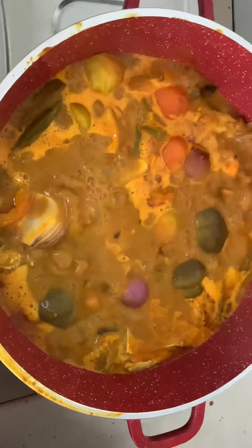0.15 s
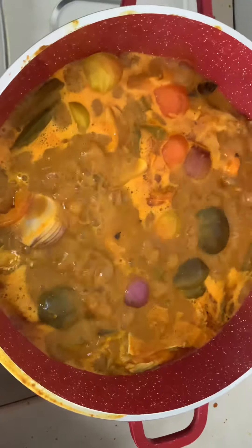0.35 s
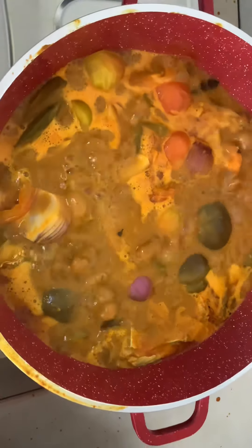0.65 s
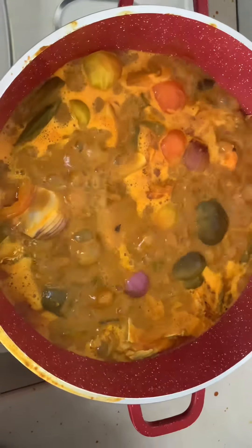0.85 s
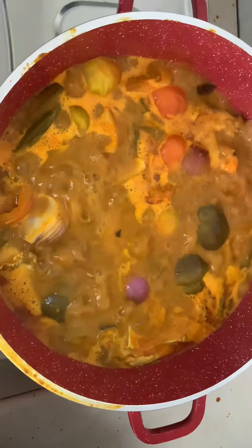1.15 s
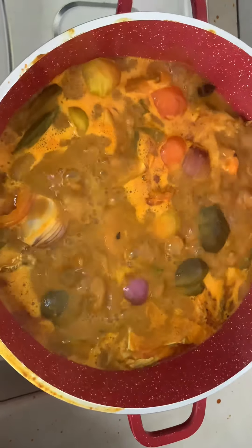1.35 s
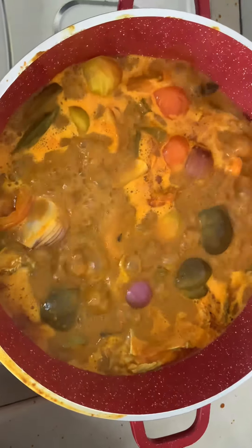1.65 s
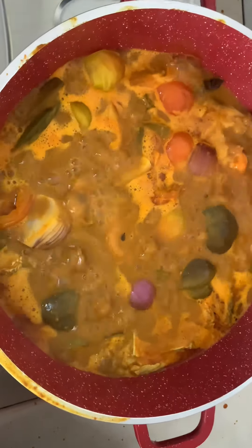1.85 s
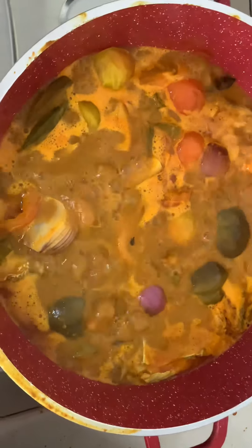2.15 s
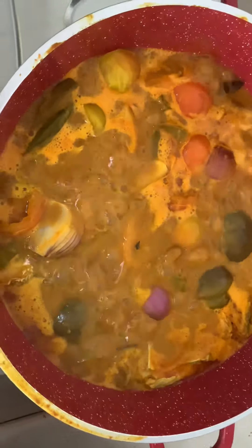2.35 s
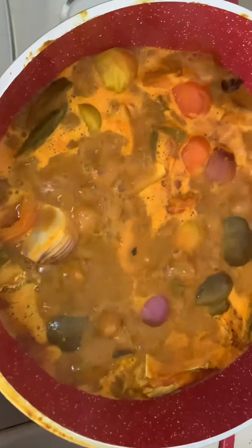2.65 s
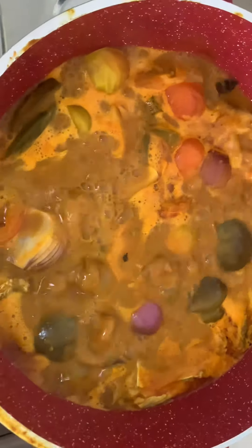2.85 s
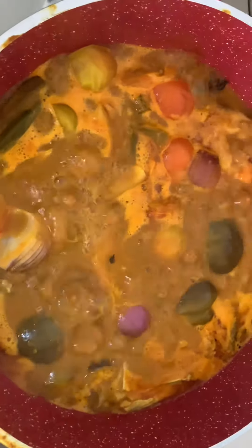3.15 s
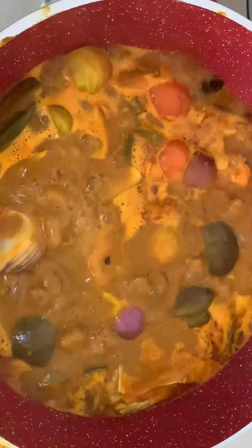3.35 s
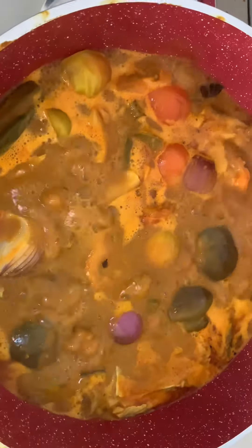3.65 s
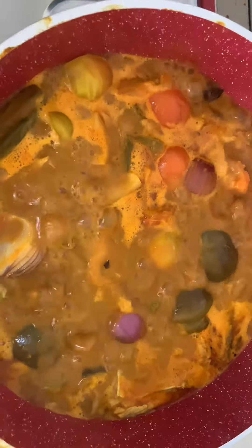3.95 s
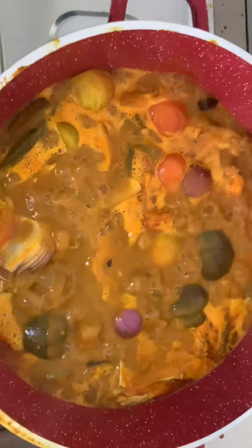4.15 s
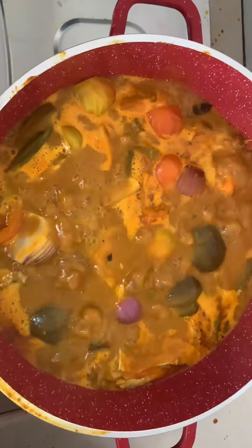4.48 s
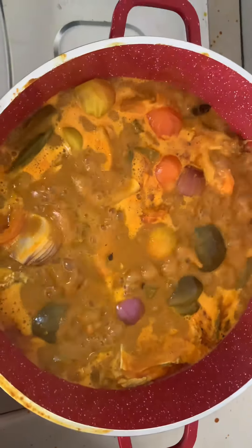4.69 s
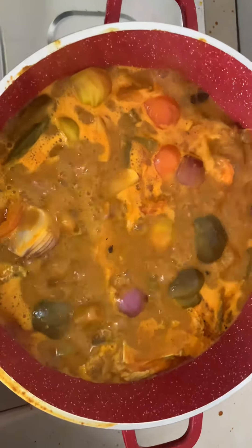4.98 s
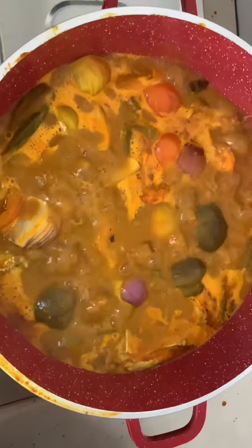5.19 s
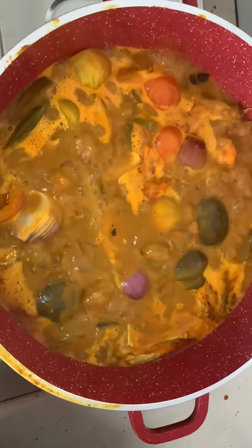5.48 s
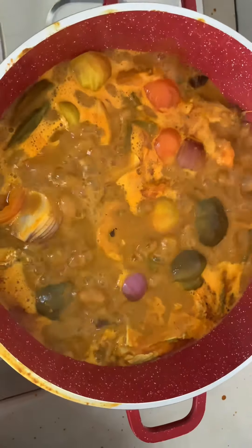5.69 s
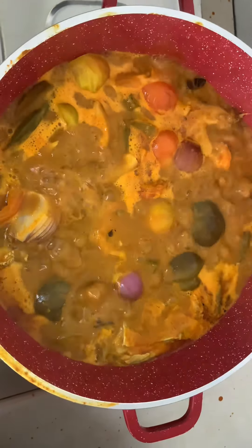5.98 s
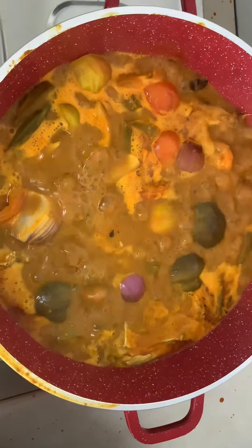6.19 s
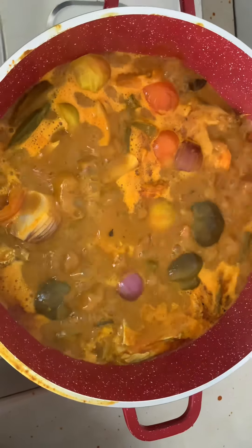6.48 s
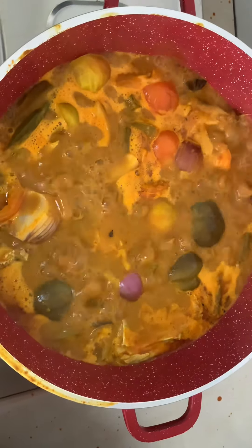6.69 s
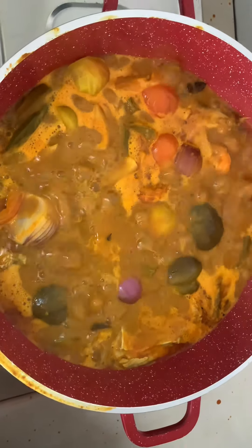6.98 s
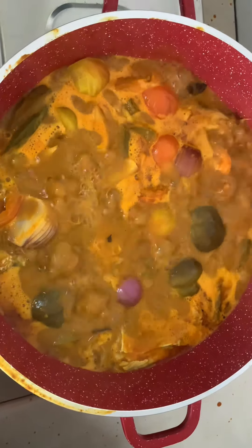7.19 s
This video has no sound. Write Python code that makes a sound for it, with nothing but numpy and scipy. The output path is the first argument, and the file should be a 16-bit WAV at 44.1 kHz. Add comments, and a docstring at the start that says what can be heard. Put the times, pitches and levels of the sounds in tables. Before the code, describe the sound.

A thick stew bubbles steadily in a wide open pan, heard from just above. Rounded wet plops of differing pitch burst irregularly, singly and in quick clusters, with small blips and faint ticks between them. Beneath runs a low, slightly wavering motor drone with soft rushing air. Close stereo hand-held microphone in a kitchen, with only short reflections from pan and room.

```python
"""A thick stew simmers in a wide open pan, heard from just above by a two-port hand-held microphone.
Bubbles burst with short plops and spit tiny ticks over a dense fizz; a motor nearby drones on the orders
of its turning rate, and its air noise rings in a few cavity resonances."""
import sys
import numpy as np
from scipy import signal
from scipy.fft import rfft, irfft, next_fast_len
from scipy.io import wavfile

SR = 44100
rng = np.random.default_rng(int(sys.argv[2]) if len(sys.argv) > 2 else 0)


def wav_record(signal):
    """Record a signal, one row per channel, as 16-bit PCM in the file named by sys.argv[1]."""
    frames = np.transpose(np.atleast_2d(signal))
    bounded = np.clip(frames, -1, 1)
    # unit amplitude maps onto the largest positive 16-bit level
    quanta = np.round(bounded * 32767).astype(np.int16)
    wavfile.write(sys.argv[1], SR, quanta)


N = 323253

# motor drone, slow swells: (s, fourth order dB, fifth order dB)
MOTOR = [(0.0, -26, -32.5), (0.12, -23.5, -42), (0.53, -24, -40), (0.57, -24.5, -59), (0.92, -27, -35), (1.84, -30, -38.5),
         (2.39, -38.5, -36.5), (2.45, -26.5, -34), (2.55, -28.5, -60), (2.72, -32.5, -35), (3.23, -27.5, -36.5), (3.29, -27.5, -44),
         (3.69, -32.5, -37.5), (3.8, -25.5, -56), (3.9, -27.5, -39), (4.53, -28, -41), (4.9, -31, -36), (5.16, -36, -40.5),
         (5.22, -47, -35), (5.37, -31, -33.5), (6.12, -32.5, -39), (6.19, -48, -40), (6.27, -36, -40), (6.84, -42, -31.5),
         (7.19, -28, -48), (7.33, -36, -43)]
FAINT_ORDERS = [(3, -54), (6, -52.5)]   # (order, dB) wavering
# air noise resonances: (Hz, width Hz, left dB, right dB)
CAVITY = [(86.24, 14.5, -41, -35.5), (121, 39, -54.5, -45), (164.5, 16, -55.5, -54.5), (213, 10, -58, -53.5), (261, 43.5, -57.5, -50), (433.7, 10.5, -57, -50),
          (479.5, 35, -86, -46.5), (670.4, 48, -61, -51.5), (731.2, 25, -60, -54.5), (870, 34, -73, -63.5), (1684, 27, -64.5, -63)]
# the loudest bubbles bursting: (s, peak dB, pitch Hz)
PLOPS = [(0.0266, -33, 690), (0.139, -34, 1006), (0.15, -22.5, 1230), (0.156, -35, 1730), (0.1773, -31, 1260), (0.222, -26, 870), (.2302, -28, 820), (.238, -41, 950), (0.2998, -41, 1640), (0.3648, -33, 1140), (.3798, -45, 1590), (0.413, -41, 3360),
         (0.477, -37, 2050), (0.481, -33, 1620), (0.49, -34, 1590), (0.499, -40, 1640), (0.509, -40, 1710),
         (0.52, -35, 1370), (.5269, -47, 1830), (0.5646, -37.5, 3380), (0.605, -35, 1040), (.7255, -47, 1760), (.7999, -41, 3430), (0.923, -36, 860), (.938, -29, 970), (.9883, -42, 2100), (1.074, -30.5, 1190), (1.1354, -39, 3640),
         (1.1807, -28, 810), (1.184, -29.5, 1150), (1.2721, -38, 2200), (1.2727, -31, 785), (1.282, -24, 850), (1.4264, -25.5, 1030), (1.4654, -26, 756),
         (1.4872, -38, 1050), (1.577, -32.5, 680), (1.7336, -42, 4170), (1.7428, -36, 1430), (1.7467, -34, 740), (1.851, -41, 740),
         (1.868, -29, 740), (1.8808, -22.5, 1130), (1.892, -37, 1290), (2.083, -37, 730), (2.214, -44, 830), (2.3063, -32, 1300), (2.321, -33.5, 950),
         (2.3522, -34.5, 1580), (2.354, -38, 1950), (2.4092, -42, 2180), (2.441, -37, 730), (2.573, -36, 860), (2.581, -32, 1840), (2.613, -39, 1400), (2.641, -39, 1700),
         (2.659, -35, 1040),
         (2.6801, -39, 1600), (2.6972, -39, 1060), (2.7266, -46, 1700), (2.8196, -39, 1370), (2.8334, -35, 1660), (2.9775, -41, 1590), (2.989, -36, 1130), (3.0394, -31, 1530), (3.1009, -28, 900), (3.198, -36.5, 1560), (3.205, -30, 1030), (3.2817, -33, 870),
         (3.329, -36, 1450), (3.3322, -42, 4120), (3.4271, -32, 790), (3.4423, -40, 1590), (3.46, -39, 834), (3.478, -38, 740), (3.517, -37, 1110),
         (3.5439, -34, 764), (3.6303, -43, 4230), (3.646, -39, 1030), (3.693, -33, 810), (3.7175, -29.5, 865), (3.7907, -30.5, 1580), (3.8134, -24.5, 840),
         (3.8296, -30, 760), (3.923, -29, 950), (3.941, -36, 1430), (3.9454, -29, 980), (3.956, -34, 990), (3.974, -38, 1600), (4.0527, -42.5, 3700), (4.065, -36, 1590),
         (4.101, -33, 810), (4.136, -22.5, 900),
         (4.154, -34, 970), (4.1658, -35.5, 3680), (4.1786, -39, 3640), (4.178, -33, 1510), (4.178, -36, 2050), (4.18, -35, 1000), (4.216, -42, 3020), (4.322, -39, 3970), (4.337, -31, 1160), (4.38, -37, 900), (4.3898, -34.5, 1480),
         (4.474, -37, 1200), (4.4881, -29.5, 760), (4.527, -33, 1300), (4.637, -32.5, 730), (4.6557, -41, 1640),
         (4.6598, -32, 710), (4.679, -35, 2150), (4.706, -38, 1380), (4.751, -33.5, 796), (4.9444, -40, 2180),
         (4.9923, -41, 3700), (5.0571, -29, 730), (5.0687, -29.5, 750), (5.1624, -41, 1500), (5.2236, -32, 660),
         (5.2388, -34, 786), (5.335, -35, 1000), (5.389, -37, 2050), (5.3949, -29, 775), (5.401, -34, 1500), (5.407, -32, 1170), (5.4182, -36, 910),
         (5.45, -29, 1310), (5.481, -26, 870), (5.569, -37, 1460), (5.647, -32.5, 735), (5.6872, -32.5, 1640),
         (5.6946, -37, 1830), (5.7166, -37, 720), (5.787, -37, 1200), (5.9049, -38, 700), (5.936, -31.5, 920), (6.11, -34, 646), (6.158, -40, 2290), (6.159, -30, 1310), (6.1734, -27.5, 1010), (6.3575, -29.5, 1150), (6.39, -33, 1200), (6.39, -36, 1750),
         (6.4868, -36, 980), (6.4935, -35, 900), (6.558, -36, 1630), (6.6137, -30, 655), (6.6774, -36, 960), (6.8362, -38, 1240), (6.843, -40, 1430),
         (6.85, -35, 1580), (6.8836, -29, 1000), (6.9534, -31, 920), (6.965, -41, 1590), (6.9667, -32.5, 740), (7.1621, -37, 1230)]
# the loudest small films snapping: (s, peak dB, pitch Hz)
TICKS = [(.413, -49, 6800), (.5765, -50, 11350), (.677, -48, 6840), (.7317, -46, 9700), (.9575, -47, 6440), (1.006, -50, 11000), (1.1108, -49, 10500), (1.1109, -49, 6870), (1.1372, -46, 7200), (1.3762, -51, 6740), (1.5872, -51, 11000), (1.5887, -47, 6460), (1.852, -54, 11500),
         (1.863, -48, 6660), (2.1111, -46, 9600), (2.162, -44, 8760), (2.2609, -48, 10140), (2.813, -46, 13100), (2.8411, -45, 8800),
         (2.9765, -47, 5630), (3.233, -50, 7040), (3.4286, -49, 9600), (3.6919, -48, 8890), (3.7203, -53, 6180), (3.9467, -52, 7000), (3.9468, -48, 11500), (3.9594, -50, 6730), (4.168, -48, 5950), (4.1961, -49, 13370), (4.2535, -53, 6420), (4.3154, -49, 12580),
         (4.6168, -56, 11500), (5.0144, -48, 5640), (5.2873, -47, 6500), (5.7388, -47, 12920), (5.978, -48, 6000), (6.1298, -47, 6720), (6.1708, -52, 7170), (6.2105, -51, 5300), (6.3025, -53, 15000), (6.3235, -52, 14100), (6.389, -48, 13400), (6.4325, -52, 8500), (6.4723, -52, 9050), (6.495, -51, 13100), (6.501, -46, 9800), (6.9705, -53, 11500)]
# the simmer: (s, bubbling dB, fizz dB)
SIMMER = [(0, -52, -83), (.35, -47, -75), (1.0, -51.5, -81), (2.04, -52.5, -60), (2.47, -53, -68.5), (4.29, -50.5, -62.5),
          (4.55, -51, -85), (5.4, -51.5, -85), (6.04, -49.5, -65), (6.74, -52.5, -65), (7.1, -50, -57), (7.33, -63, -78)]
# steady air and steam noise: (Hz, left dB per Hz, right-left dB, likeness 0-1)
AIR = [(25, -47, 26, .99), (49.4, -31, 11, 0.5), (109, -8, 2, 0.97), (185, -18, 8, 0.98), (323, -11.5, 7, 0.48),
       (550, -11, -10, 0.), (900, -12, 1, 0.), (2020, -18.5, 0, 0.75), (2900, -19, -3, 0.1), (3700, -23, -15, 1), (5900, -27, -34, 0.9),
       (7700, -36, -68, 0.3), (8600, -36.5, -16, 0.4), (10500, -35, -10, 1), (14700, -37, -5, 0)]
AIR_DB = -44.5
STEADY_ABOVE_HZ = 4000   # the flicker of the air fades toward the treble; fixed
TREBLE_SWELL_DB = 0.8   # slow swells shared by the treble; fixed
FIFTH_WANDER = 1.21   # radians by which the fifth order slips against the others
SHARED_ABOVE_HZ, RIGHT_LAG_S = 3000, .000234   # treble: one signal, late on the right; fixed
CUTOFF_HZ = 15750   # fixed
PORT_HZ, PORT_WIDTH_HZ, PORT_DB = 12300, 1100, 9   # resonance of the microphone port; fixed
TURNS_PER_S = 19.1   # fixed
# puffs of steam: (s, half length s, dB)
PUFFS = [(6.782, 0.12, -57.5), (7.1, 0.056, -58.5)]
PAN_BELOW_HZ, PAN_DB = 1400, 10   # deep sounds from the pan favour the right port; fixed
# phase of the right port against the left below the shared treble: (Hz, radians)
RIGHT_PHASE = [(600, 0), (1000, -.9), (1800, -.5), (2400, -2.2), (2750, -2.4), (3300, -1.5)]   # fixed
# a deep bubble throws a higher blip just ahead and a weaker bubble after it
DEEP_BELOW_HZ = 1050   # fixed
BLIP_HZ, BLIP_LEAD_S, BLIP_DB = 1580, 0.00161, -15
AFTER_S, AFTER_DB = .011, -16   # fixed
# lesser bubbles, spits and snaps come at random: (peak dB, spread dB, lowest Hz, highest Hz)
LESSER_PLOPS, LESSER_SPITS, LESSER_TICKS = (-45.5, -5, 604, 1900), (-54, 0, 2599, 4696), (-55, 4, 6400, 13500)
EIGHTH_DB, EIGHTH_GROWTH = -49, 1.3   # eighth order at a fourth of -27 dB; dB gained per dB of the fourth
# runs of small bubbles near one pitch: (s, half length s, dB)
RUNS = [(.31, 0.036, -50), (.475, 0.051, -45.5), (.75, 0.052, -50.5), (2.76, 0.1, -53)]
SPLASH_DB, SPLASH_S, SPLASH_HZ = -24, .003, 1100   # each listed bubble throws a short spray: level under it, decay, lowest pitch


def from_db(db):
    """Decibels to gain."""
    return 10 ** (np.asarray(db) / 20)


def rms_one(x):
    """Scale to rms 1."""
    return x / np.sqrt(np.mean(x ** 2) + 1e-20)


def in_time(rows):
    """Columns of a curve table, one value per sample."""
    s, *columns = np.transpose(rows)
    return [np.interp(np.arange(N) / SR, s, c) for c in columns]


def drift(rate):
    """Slow chance: noise through a double one-pole low-pass; spread 1."""
    r = np.exp(-80 * np.pi * rate / SR)  # fixed
    slow = signal.lfilter([1], [1, -2 * r, r * r], rng.standard_normal(N // 40 + 2002))[2000:]  # fixed
    return np.interp(np.arange(N) / 40, np.arange(len(slow)), rms_one(slow))  # fixed


def ring(x, hz, width_hz):
    """Two-pole resonance; a unit click rings with height 1."""
    r, w = np.exp(-np.pi * width_hz / SR), 2 * np.pi * hz / SR
    return signal.lfilter([0, np.sin(w)], [1, -2 * r * np.cos(w), r * r], x + 1e-18)


def motor(waver_db):
    """Sines on the orders of the turning rate; the eighth order grows with the fourth."""
    fourth_db, fifth_db = in_time(MOTOR)
    angle = 2 * np.pi * np.cumsum(TURNS_PER_S + 0.097 * drift(1.57)) / SR   # the speed hunts a little
    slip = FIFTH_WANDER * drift(2.32)
    orders = [(4.0, fourth_db + 1.13 * drift(5.3)), (5.0, fifth_db + 1.3 * drift(8.5))]
    orders += [(8.0, EIGHTH_DB + EIGHTH_GROWTH * (fourth_db + 27.0) + 1.7 * drift(7.5))]
    orders += [(k, db + waver_db * drift(3.9)) for k, db in FAINT_ORDERS]
    return sum(np.sqrt(2) * from_db(db) * np.sin(round(k) * angle + (round(k) == 5) * slip + rng.uniform(0, 2 * np.pi)) for k, db in orders)


def cavity():
    """Air noise ringing twice through each resonance; high ones differ between the ports."""
    out = np.zeros((2, N))
    for hz, width_hz, left_db, right_db in CAVITY:
        white, waver = rng.standard_normal((2, N)), 0.95 * drift(22.0)
        white[1] += white[0] * (350 / hz) ** 3
        for side, db in zip(range(2), (left_db, right_db)):
            out[side] += from_db(db + waver) * rms_one(ring(ring(white[side], hz, width_hz), hz, width_hz))
    return out


def air(patchy_db):
    """Third-octave bands of noise, each with its level, balance, likeness and flicker."""
    out, together, swell, table = 0, drift(17.6), drift(6.0), np.transpose(AIR)
    edges, white = 20 * 2 ** np.arange(0, 9.9, 1 / 3), rng.standard_normal((2, 2, N))  # fixed
    for k, (low, high) in enumerate(zip(edges, edges[1:])):
        left, other = signal.sosfilt(signal.butter(2, [low, high], "band", fs=SR, output="sos"), white[k % 2])
        level_db, right_db, alike = [np.interp(np.log(low * high) / 2, np.log(table[0]), c) for c in table[1:]]
        alike = np.clip(alike, 0, 1)
        right = from_db(right_db) * (alike * left + np.sqrt(1 - alike ** 2) * other)
        flicker_db = patchy_db / (1 + high / STEADY_ABOVE_HZ) * (0.35 * together + drift(17.5))
        flicker_db += TREBLE_SWELL_DB * swell * (low > STEADY_ABOVE_HZ)
        out = out + from_db(level_db + flicker_db) * np.array([left, right])
    return from_db(AIR_DB) * rms_one(out)


def grains(per_s, low_hz, high_hz, cycles, spread_db, count):
    """Random bursts in clumps, dealt to resonators spread in pitch; ringing twice rounds the onset; rms 1."""
    sizes = from_db(spread_db * np.minimum(rng.exponential(1, N), 3.0)) * rng.choice([-1, 1], N)
    born = rng.random(N) < per_s * from_db(4.0 * drift(9.0)) / SR
    pitches, dealt = np.geomspace(low_hz, high_hz, count), rng.integers(0, count, N)
    out = np.zeros(N)
    for k, hz in enumerate(pitches):
        out += hz * ring(ring(sizes * born * (dealt == k), hz, hz / cycles), hz, hz / cycles)
    return rms_one(out)


def burst(s, peak_db, hz, cycles, rise):
    """One cavity opening, loudest at s: a sine that swells, climbs in pitch and dies."""
    turn = np.arange(-round(6 * cycles * SR / hz), round(6 * cycles * SR / hz)) * hz / SR
    shape = 1 / np.cosh(np.where(turn < 0, 1.1, 1.3) * turn / cycles)
    return s + turn[0] / hz, from_db(peak_db) * shape * np.cos(2 * np.pi * turn * (1 + rise * turn / cycles))


def add(out, s, sound):
    """Mix a short sound in at a time."""
    i = round(s * SR)
    out[..., i:i + sound.shape[-1]] += sound[..., :N - i]


def plops():
    """Each bursting bubble; small ones ring more cycles."""
    out, chance = np.zeros(N), rng.standard_normal((len(PLOPS), 4))
    deep = [(row, c) for row, c in zip(PLOPS, chance) if row[2] < DEEP_BELOW_HZ]
    blips = [(s - BLIP_LEAD_S, db + BLIP_DB + 3 * c[0], BLIP_HZ * (1 + 0.33 * c[1])) for (s, db, hz), c in deep]
    afters = [(s + AFTER_S * (1 + 0.302 * c[2]), db + AFTER_DB + 3 * c[3], hz) for (s, db, hz), c in deep]
    for s, peak_db, hz in [*PLOPS, *blips, *afters, *at_random(LESSER_PLOPS, count=60), *at_random(LESSER_SPITS, count=30)]:
        more = (hz / 1000) ** .6  # fixed
        add(out, *burst(s, peak_db, hz, cycles=1.0 * more, rise=0.015))  # fixed
    return out


def ticks():
    """Each snap: a brief ring and a broad crack of noise."""
    snaps = [*TICKS, *at_random(LESSER_TICKS, count=20)]
    out, cracks = np.zeros(N), rng.standard_normal((len(snaps), 200))
    for (s, peak_db, hz), crack in zip(snaps, cracks):
        add(out, *burst(s, peak_db + 8.5, hz, cycles=0.92, rise=0.0043))
        add(out, s, from_db(peak_db - 6) * np.diff(crack) * np.exp(-np.arange(199) / (0.0011 * SR)))
    return out


def echoes(x, t60, level_db, count):
    """Scattered reflections off the pan wall and the kitchen, other ones for each port."""
    lags = rng.uniform(0.002046, 0.11, (2, count))
    response = np.zeros((2, round(.12 * SR)))  # fixed
    for side in range(2):
        np.add.at(response[side], (lags[side] * SR).astype(int).clip(0, round(.11 * SR)),  # fixed
                  from_db(level_db - 60 * lags[side] / t60) * rng.choice([-1, 1], count))  # fixed
    return signal.fftconvolve(x * np.ones((2, 1)), response, axes=1)[:, :N]


def at_ports(x):
    """The left port hears less of the deep part."""
    deep = signal.sosfilt(signal.butter(1, PAN_BELOW_HZ, fs=SR, output="sos"), x)
    return np.array([x - (1 - from_db(-PAN_DB)) * deep, x])


def swells(rows):
    """Bell-shaped level rises at given times."""
    t = np.arange(N) / SR
    return sum(from_db(db) * np.exp(-((t - s) / half) ** 2) for s, half, db in rows)


def steam():
    """Puffs of bright hiss, and quick runs of small bubbles."""
    hiss = signal.sosfilt(signal.butter(2, [6000, 10500], "band", fs=SR, output="sos"), rng.standard_normal(N))
    run = grains(400, 1560, 1780, cycles=9.0, spread_db=0, count=5)  # fixed
    return rms_one(hiss) * swells(PUFFS) + run * swells(RUNS)


def at_random(kind, count):
    """Rows (s, peak dB, pitch Hz) scattered over the scene."""
    peak_db, spread_db, low_hz, high_hz = kind
    when, size, pitch = rng.random((count, 3)).T
    return np.transpose([.02 + when * (N / SR - .05), peak_db + spread_db * (2 * size - 1), low_hz * (high_hz / low_hz) ** pitch])  # fixed


def splashes():
    """A brief bright spray of noise with each listed bubble."""
    out, sprays = np.zeros(N), rng.standard_normal((len(PLOPS), 900))
    for (s, peak_db, hz), spray in zip(PLOPS, sprays):
        add(out, s - .001, from_db(peak_db + SPLASH_DB + 3.6 * spray[0]) * spray * np.exp(-np.arange(900) / (SPLASH_S * SR)))
    return signal.sosfilt(signal.butter(2, [SPLASH_HZ, 3000], "band", fs=SR, output="sos"), out)


def scene():
    """Pan, steam and motor at the two ports."""
    bubbling_db, fizz_db = in_time(SIMMER)
    bubbling = from_db(bubbling_db) * grains(160, 584, 1986, cycles=3.7, spread_db=3.5, count=26)
    fizz = from_db(fizz_db) * grains(1200, 2640, 11850, cycles=6.9, spread_db=6.0, count=16)  # fixed
    body = from_db(1.5) * plops() + splashes() + bubbling
    wet = echoes(body, t60=.12, level_db=-20, count=90)  # fixed
    pan = at_ports(body + fizz + ticks() + steam()) + wet
    return pan + air(patchy_db=3.0) + cavity() + motor(waver_db=1.5) * from_db([[-1.6], [1.4]])


def record(dry):
    """The treble of both channels comes from one port, the right is turned in phase; the port rings; the top is cut."""
    size = next_fast_len(N + SR)
    hz = np.arange(size // 2 + 1) * SR / size
    left, right = rfft(dry, size) * from_db(PORT_DB / (1 + (2 * (hz - PORT_HZ) / PORT_WIDTH_HZ) ** 2))
    share = .9 / (1 + (SHARED_ABOVE_HZ / (hz + 1)) ** 12)  # fixed
    phase = np.interp(hz, *np.transpose(RIGHT_PHASE))
    phase -= 2 * np.pi * RIGHT_LAG_S * np.maximum(hz - 3650, 0)   # a plain delay higher up; fixed
    right = (np.sqrt(share) * left + np.sqrt(1 - share) * right) * np.exp(1j * phase)
    both = irfft(np.array([left, right]), size)[:, :N]
    return signal.sosfilt(signal.ellip(14, .5, 70, CUTOFF_HZ, fs=SR, output="sos"), both)  # fixed


dry = scene()
out = record(dry)
wav_record(out)
```